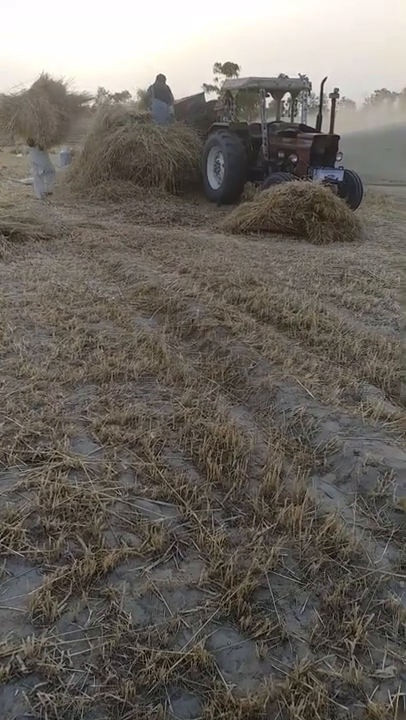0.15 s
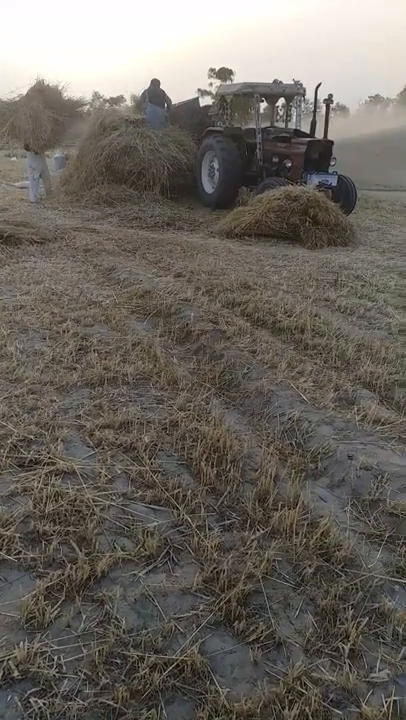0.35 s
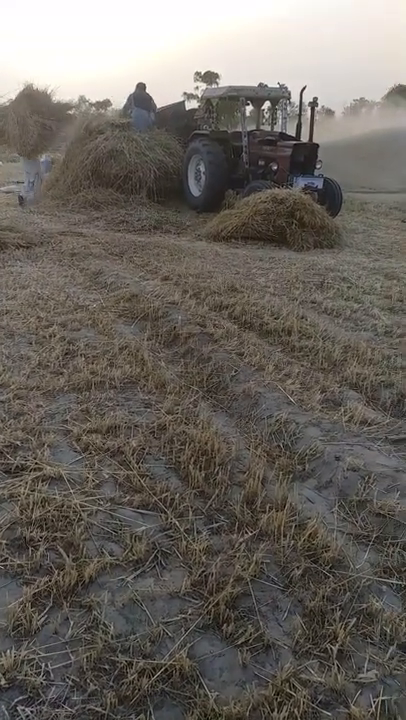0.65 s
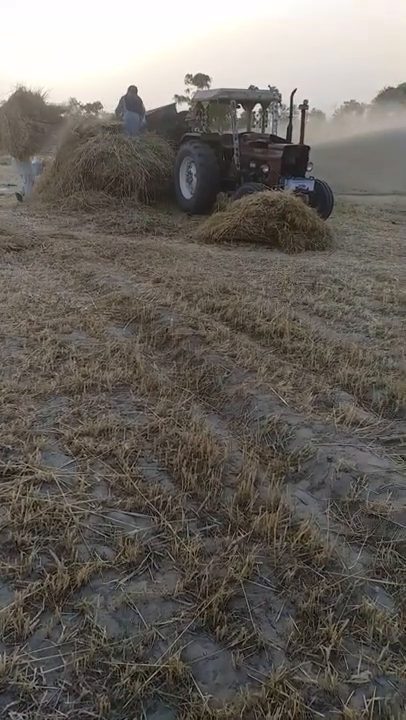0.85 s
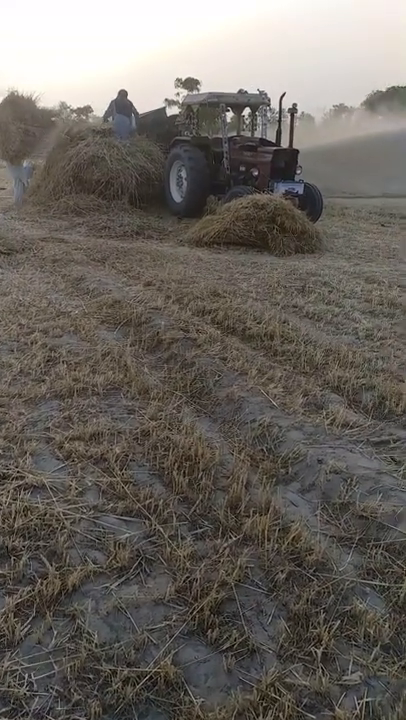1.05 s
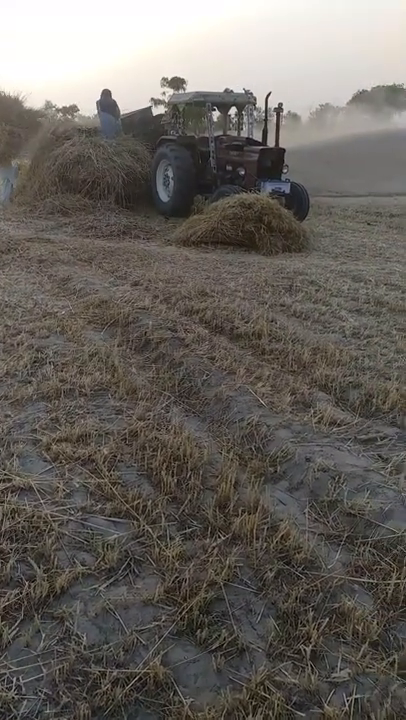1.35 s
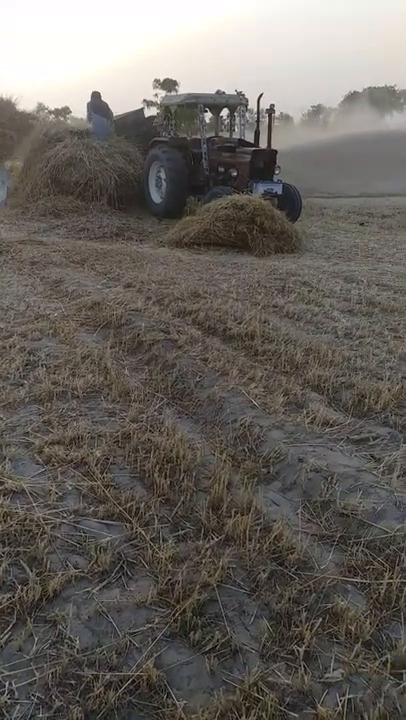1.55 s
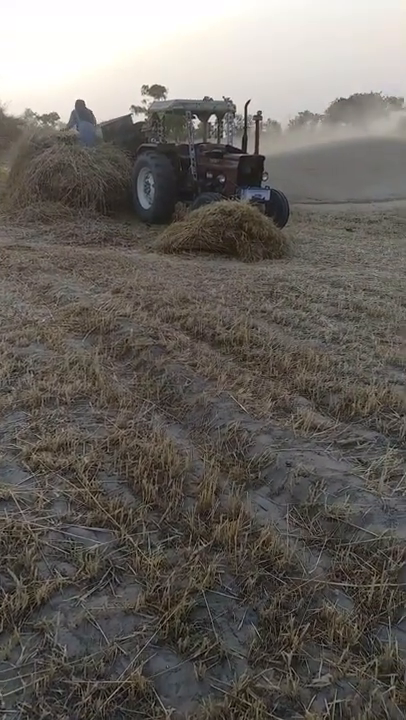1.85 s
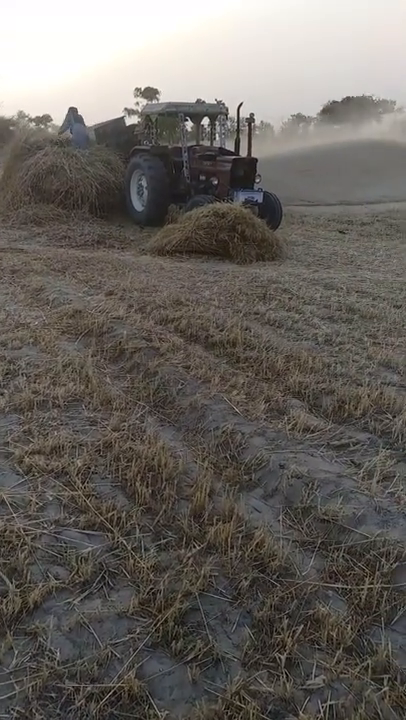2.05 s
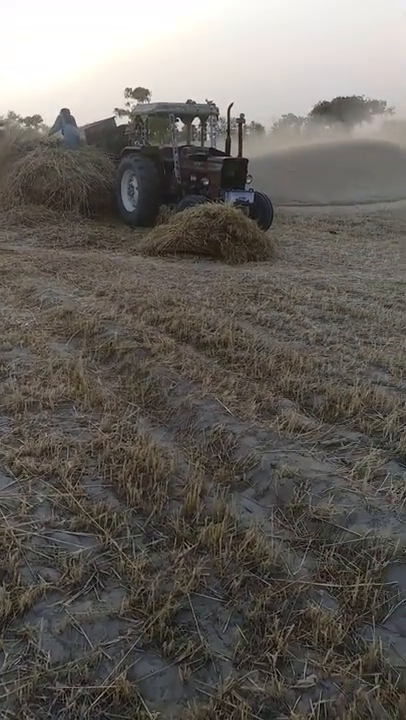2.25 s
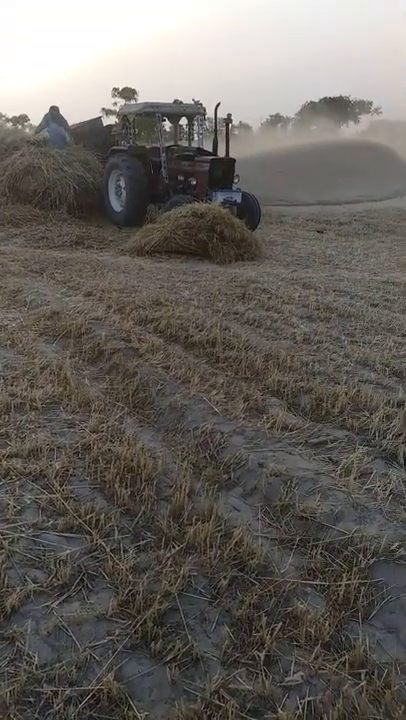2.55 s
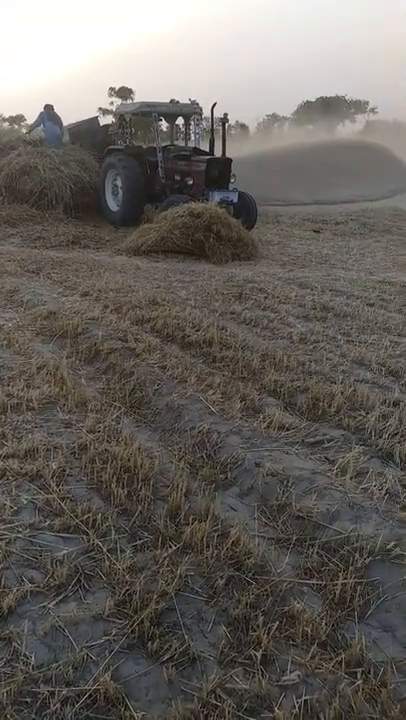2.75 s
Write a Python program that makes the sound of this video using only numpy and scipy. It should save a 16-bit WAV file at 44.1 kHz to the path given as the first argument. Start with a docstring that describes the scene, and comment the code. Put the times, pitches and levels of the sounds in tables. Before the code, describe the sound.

A diesel tractor runs a straw thresher some way off in an open field. Its steady drone and knock blend with rushing straw and air, wavering gear whine and light metal chinks, as the engine slows slightly under load.

```python
"""Tractor driving a straw thresher

A four-cylinder diesel runs some way off in a stubble field. Its exhaust, the threshing drum and the blower
drone against each other, all geared to one engine speed that sags under load. Gear whine, diesel knock and a
chinking injector ring ride on the roar of straw and air; dry stubble snaps close by."""
import sys
import numpy as np
from scipy import signal
from scipy.fft import rfft, irfft
from scipy.io import wavfile

SR = 44100
rng = np.random.default_rng(int(sys.argv[2]) if len(sys.argv) > 2 else 0)


def put_to_file(sound):
    """Save the sound as 16-bit audio at rate SR, in the file named by the first command-line argument."""
    columns = np.atleast_2d(sound).T  # one column per channel
    safe = np.clip(columns, -1, 1)
    whole_steps = np.round(safe * 32767)
    wavfile.write(sys.argv[1], SR, whole_steps.astype(np.int16))


N = 128331
TIME = np.arange(N) / SR
FREQS = np.fft.rfftfreq(N, 1 / SR)

DRUM_RATIO, BLOWER_RATIO = 1.5755, 2.465  # shaft turns per engine cycle (two crank revolutions)
# ring of the engine block and sheet-metal housing: frequency_hz, density_db
BODY = [(300, -91), (475, -61.5), (515, -47), (543, -43), (572, -51.5), (600, -43), (626, -54.5),
        (645, -47), (760, -50.5), (825, -50.5), (865, -45), (930, -51.5), (970, -54.5), (1060, -58.5),
        (1165, -54.5), (1205, -50), (1260, -52), (1480, -53), (1550, -61), (1750, -63.5), (1930, -56),
        (2080, -59.5), (2250, -68.5), (2600, -61.5), (2900, -70), (3150, -64.5), (3480, -72), (3700, -74),
        (4250, -76), (4480, -80), (4730, -75.5), (5150, -81), (5350, -76.5), (5620, -87), (5950, -78.5),
        (6230, -88.5), (6480, -83.5), (7600, -100), (8200, -118)]
# accent of each cylinder, in firing order: gain_db
CYLINDER_DB = [-3, -1.5, -2.5, -1.5]


def amp(db):
    """Decibels to gain."""
    return 10 ** (np.asarray(db) / 20)


def unit(x):
    """Scales to an rms of one."""
    return x / np.sqrt(np.mean(abs(x) ** 2) + 1e-20)


def curve(points):
    """Follows a table over time."""
    return np.interp(TIME, *np.transpose(points))


def over_hz(points):
    """Follows a table over log frequency."""
    hz, value = np.transpose(points)
    return np.interp(np.log(FREQS + 1), np.log(hz + 1), value)


def colour(x, spectrum):
    """Gives a white excitation a spectrum in dB per Hz."""
    return irfft(rfft(unit(x)) * amp(over_hz(spectrum)), N) * np.sqrt(SR / 2)


def drift(rate_hz):
    """Slow random motion with an rms of one."""
    lowpass = np.exp(-(FREQS / rate_hz) ** 2) * (FREQS > 0)
    return unit(irfft(rfft(rng.standard_normal(N)) * lowpass, N))


def strike(age_s, rise_s):
    """Envelope of a hit: silence before it, a quick rise to one, a slower fall."""
    age = np.maximum(age_s, 0) / rise_s
    return age * np.exp(1 - age)


def tones(turns, partials, waver, rate_hz):
    """Tones locked to a shaft, each wavering in level and phase."""
    out = np.zeros(N)
    for order, db in partials:
        flutter = unit(1 + waver * (drift(rate_hz) + 1j * drift(rate_hz)))
        carrier = np.exp(2j * np.pi * (order * turns + rng.random()))
        out += amp(db) * np.sqrt(2) * (flutter * carrier).real
    return out


def firings(cycles, rise_s, spread_db, cylinder_db):
    """Envelope with a short burst at each firing, uneven in strength."""
    count = (cycles + .945) * len(cylinder_db)  # starts partway through a cycle
    index = np.floor(count).astype(int)
    age_s = (count % 1) / np.gradient(count, TIME)
    accent_db = np.take(cylinder_db, index % len(cylinder_db))
    uneven_db = spread_db * rng.uniform(-0.88, 1, size=512)[index]
    return strike(age_s, rise_s) * amp(accent_db + uneven_db)


def drone(cycles):
    """Exhaust, drum and blower each sound harmonics of their own rotation and beat against each other."""
    # exhaust tones: multiple_of_engine_cycle, level_db
    exhaust = [(4, -31), (5, -49), (8, -24.5), (9, -39.5), (10, -44), (11, -41), (12, -36), (15, -44),
               (16, -37.5), (19, -41.5), (20, -43.5), (21, -48), (25, -44), (26, -49), (30, -39.5)]
    # drum tones: multiple_of_drum_turn, level_db
    drum = [(2, -38.5), (3, -29), (4, -26), (6, -28.5), (7, -42.5), (8, -32.5), (9, -41.5), (12, -41)]
    # blower tones: multiple_of_blower_turn, level_db
    blower = [(4, -42), (5, -30.5), (6, -37.5), (11, -40), (12, -41), (15, -35.5), (17, -32), (18, -32)]
    # fader rides on those tones: time_s, exhaust_db, drum_db, blower_db
    rides = [(0, 0.5, -2, 1), (.7, 1, 0.5, 0.5), (1.3, -0.2, 0, 0.5), (1.8, -0.8, .5, 1.5),
             (2.15, -1, 1, -4.5), (2.45, -2, 1, -0.5), (2.9, -.5, 2, -2.5)]
    times, *gains_db = np.transpose(rides)
    shafts = (1, exhaust), (DRUM_RATIO, drum), (BLOWER_RATIO, blower)
    out = np.zeros(N)
    for (ratio, partials), db in zip(shafts, gains_db):
        out += amp(np.interp(TIME, times, db)) * tones(cycles * ratio, partials, waver=.13, rate_hz=3)
    return out


def gears(cycles):
    """Unsteady hums and whines of the drive, and a housing ring near 860 Hz; the loudest swell and fade."""
    # swelling tones, from low hum to high whine: multiple_of_engine_cycle, waver_depth
    swell_tones = [(8.9, .2), (37.76, .15), (59.13, .15), (61.5, .3), (78, .4)]
    # their levels: time_s, hum_db, howl_db, mid_whine_db, housing_ring_db (order 61.5, near 860 Hz),
    # high_whine_db
    swells = [(0, -32, -28, -30, -35, -33), (.5, -30, -25, -34, -32, -31), (.8, -34, -32, -27.5, -33, -33),
              (1.12, -24, -25, -28, -35, -34), (1.38, -30, -30, -28.5, -31.5, -33),
              (1.64, -29, -33, -24, -32, -35), (1.92, -23.5, -34, -36, -34, -36),
              (2.22, -37, -36, -38, -32, -39), (2.55, -28, -38, -39, -26, -39),
              (2.9, -32, -32, -39, -30, -36)]
    # whine of gears, belts and cooling fan: multiple_of_engine_cycle, level_db
    whine = [(38.41, -32.5), (63.8, -37), (83.85, -37.5)]
    times, *levels_db = np.transpose(swells)
    swelling = np.zeros(N)
    for (order, waver), db in zip(swell_tones, levels_db):
        swelling += amp(np.interp(TIME, times, db)) * tones(cycles, [(order, 0)], waver, rate_hz=6)
    return swelling + tones(cycles, whine, waver=.25, rate_hz=6)


def injector_ring(cycles, pitch_hz=3770, rise_s=.0017, rattle_db=-48.5):
    """Each injector tick rings a bright 3.77 kHz mode; now and then it chinks harder."""
    # the hardest chinks: start_s, level_db
    hits = [(.4205, -30), (1.0075, -34), (1.6700, -31), (2.0560, -33), (2.1640, -32), (2.1970, -32),
            (2.3060, -26), (2.3410, -31), (2.5930, -30), (2.7380, -33), (2.7720, -33), (2.8420, -31),
            (2.8790, -32)]
    rattle = amp(rattle_db) * unit(firings(cycles, rise_s, spread_db=4, cylinder_db=CYLINDER_DB))
    chinks = sum(amp(db) * strike(TIME - start, rise_s) for start, db in hits)
    ring = np.sin(2 * np.pi * pitch_hz * TIME + 2 * drift(40))
    return (rattle + chinks) * ring


def diesel(cycles, knock_db=-9, clatter_db=-6):
    """Combustion knock and valve clatter ring the block; an injector ticks at each firing."""
    # ring of the injectors: frequency_hz, density_db
    injector = [(1200, -88), (1950, -64.5), (2250, -82), (2650, -70), (2900, -79), (3150, -73), (3480, -92),
                (4300, -88), (4800, -84), (6200, -95), (7000, -104), (8000, -125)]
    blows = firings(cycles, rise_s=.0035, spread_db=2, cylinder_db=np.zeros(4))
    knock = colour(blows * rng.standard_normal(N), BODY)
    valve_noise = rng.standard_normal(3072)  # loops once per engine cycle
    clatter = colour(valve_noise[(cycles % 1 * len(valve_noise)).astype(int)], BODY)
    injections = firings(cycles, rise_s=.0023, spread_db=3, cylinder_db=CYLINDER_DB)
    ticks = colour(injections * rng.standard_normal(N), injector)
    return amp(knock_db) * knock + amp(clatter_db) * clatter + ticks


def thresher(cycles, throb_depth=.16, straw_db=-3.2):
    """Straw and air roar through the housing, throbbing with the drum, over a low rumble."""
    # low rumble of the thresher: frequency_hz, density_db
    rumble = [(20, -77.5), (33, -72.5), (48, -61.5), (70, -53.5), (110, -50), (150, -47.5), (220, -48.5),
              (300, -56), (400, -56.5), (470, -59.5), (600, -82.5), (1000, -120)]
    throb = 1 + throb_depth * np.cos(2 * np.pi * DRUM_RATIO * cycles)
    straw = colour(throb * rng.standard_normal(N), BODY)
    return amp(straw_db) * straw + colour(rng.standard_normal(N), rumble)


def hiss():
    """A fine, airy hiss creeps up in level."""
    # colour of the hiss: frequency_hz, density_db
    spectrum = [(6500, -125), (8200, -113), (9500, -106), (10500, -99), (11800, -86.5), (13000, -86),
                (14200, -88), (15700, -88)]
    # its fader ride: time_s, gain_db
    ride = [(0, -3), (.8, -0.7), (1.8, -0.5), (2.9, 0)]
    return amp(curve(ride)) * colour(rng.standard_normal(N), spectrum)


def stubble(low_cut_hz=11800):
    """Dry stalks give tiny bright snaps close by."""
    # snaps ahead of the low cut: start_s, level_db
    snaps = [(1.255, -40), (1.791, -43), (1.8335, -32), (2.2025, -42), (2.2092, -34), (2.2605, -34)]
    bursts = np.zeros(N)
    for start, db in snaps:
        bursts += amp(db) * strike(TIME - start, rise_s=.0008) * rng.standard_normal(N)
    low_cut = signal.butter(5, low_cut_hz, btype="high", fs=SR, output="sos")
    return signal.sosfilt(low_cut, bursts)


def field_stereo(mono):
    """Near mono: the upper mids lean left, and faint side noise stands for the field's scatter."""
    # stereo lean: frequency_hz, left_minus_right_db
    balance = [(500, 0), (1400, .35), (2000, 1.25), (2800, 1.2), (3600, 0)]
    # scattered sound relative to the housing's ring: frequency_hz, gain_db
    scatter = [(300, -58), (600, -42), (1000, -37), (1400, -32), (2000, -23), (2800, -22), (3400, -24),
               (4200, -32), (6000, -48)]
    lean_db = over_hz(balance) / 2
    side = rfft(colour(rng.standard_normal(N), BODY)) * amp(over_hz(scatter))
    return irfft(rfft(mono) * amp([lean_db, -lean_db]) + [side, -side], N)


def scene():
    """One sagging engine speed drives the whole machine; hiss and stubble sit on top."""
    # engine speed under load: time_s, speed_rpm
    speed = [(0.0, 1736.0), (0.25, 1739.0), (0.6, 1736.6), (1.0, 1731.3), (1.3, 1722.2), (1.55, 1723.3),
             (1.8, 1715.9), (2.0, 1695.4), (2.25, 1679.8), (2.55, 1674.2), (2.91, 1662.9)]
    # fader ride on diesel and thresher together: time_s, gain_db
    roar_ride = [(0, 0.5), (.55, 0.5), (.85, 1), (1.25, 0.2), (1.55, 0.9), (1.9, -0.3), (2.2, -0.5),
                 (2.6, 0.5), (2.9, 0.5)]
    rpm = curve(speed) * (1 + .0025 * drift(8))  # slight speed jitter
    cycles = np.cumsum(rpm / 120) / SR  # one engine cycle per two revolutions
    machine = drone(cycles) + gears(cycles) + injector_ring(cycles)
    roar = amp(curve(roar_ride)) * (diesel(cycles) + thresher(cycles))
    return field_stereo(machine + roar + hiss() + stubble())


def record(dry, cutoff_hz=15760):
    """A steep high cut takes off the very top."""
    taps = signal.firwin(1501, cutoff_hz, window=("kaiser", 9), fs=SR)
    return signal.oaconvolve(dry, taps[None], "same")


dry = scene()
out = record(dry)
put_to_file(out)
```